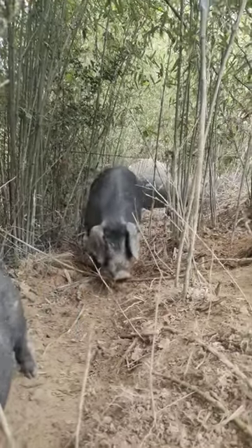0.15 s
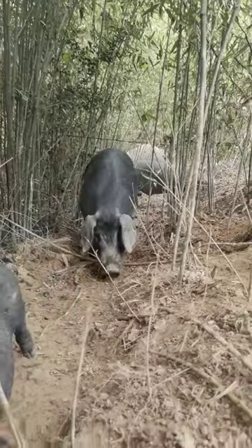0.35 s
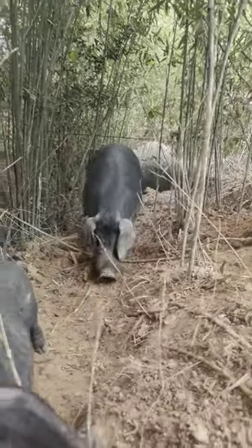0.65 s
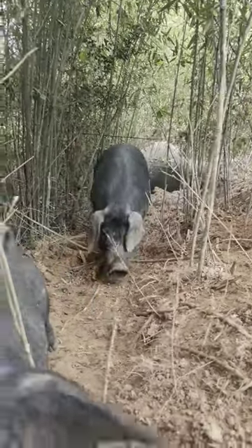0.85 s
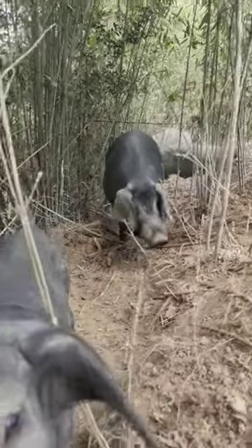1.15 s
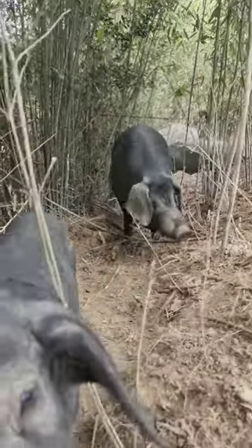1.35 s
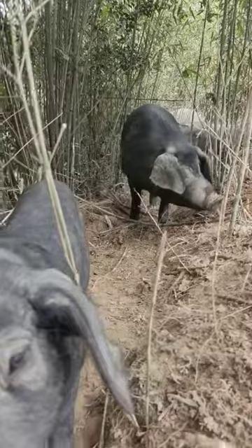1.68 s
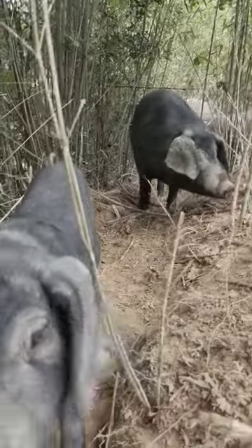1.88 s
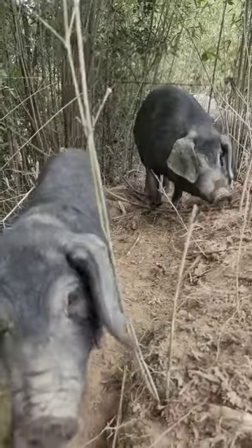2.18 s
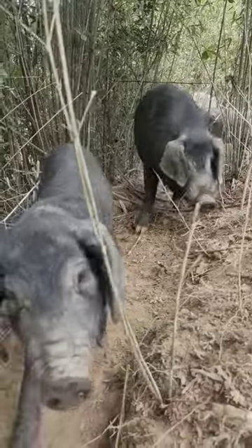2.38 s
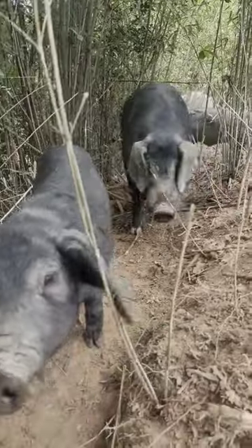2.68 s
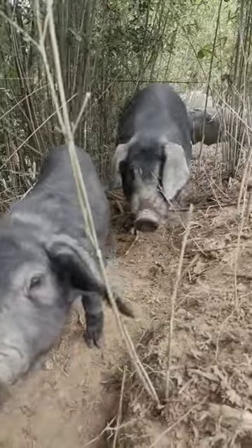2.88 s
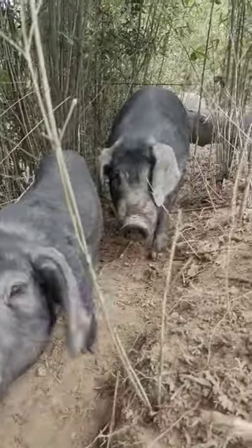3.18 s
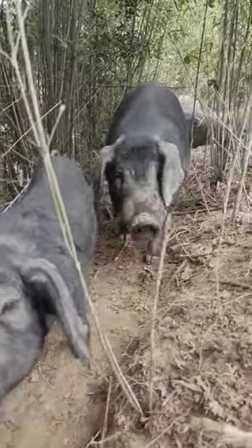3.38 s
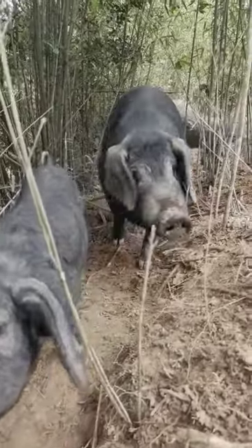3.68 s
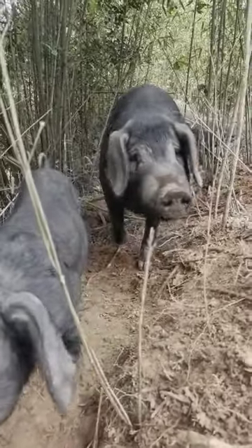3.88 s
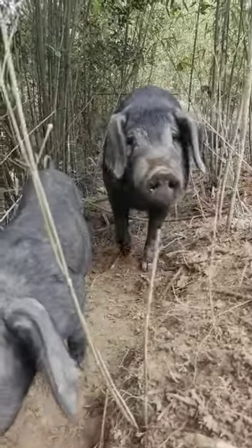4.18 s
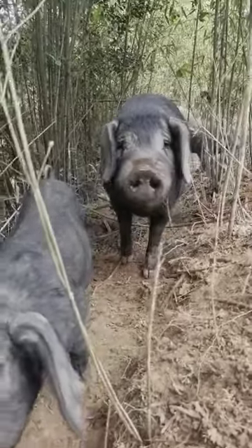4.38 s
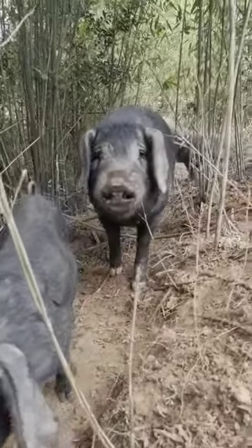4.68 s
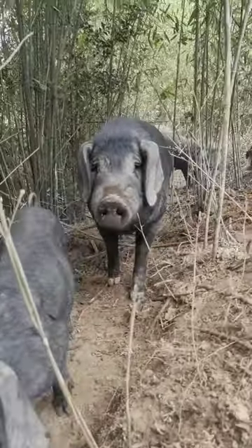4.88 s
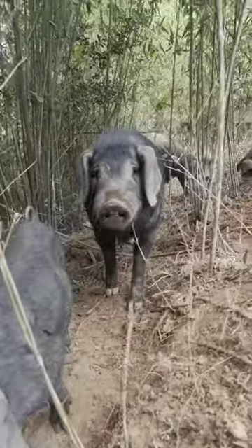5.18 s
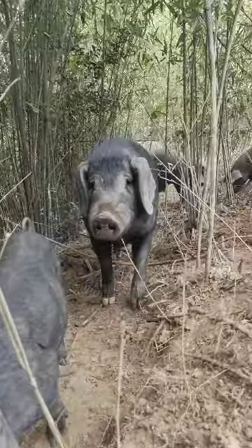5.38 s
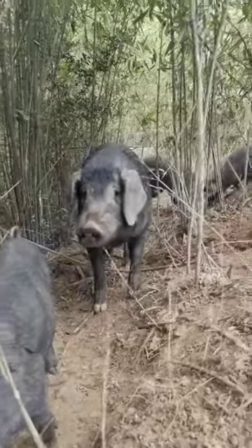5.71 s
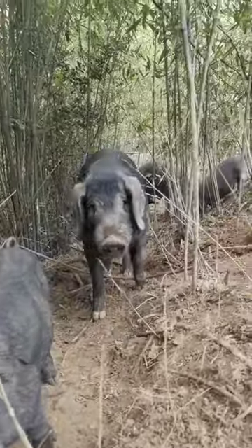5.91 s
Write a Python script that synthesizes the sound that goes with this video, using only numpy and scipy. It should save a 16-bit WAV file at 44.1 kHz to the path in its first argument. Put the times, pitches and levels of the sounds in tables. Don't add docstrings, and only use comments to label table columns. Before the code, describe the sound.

Pigs forage in a bamboo grove. Twigs snap at the start, then soft, closed-mouth grunts come from a little further off among lip smacks and rustling leaves. A short pulsing growl comes before two seconds, and midway one close, wet snort flutters loudest of all. A cicada on the right keeps sweeping upward over a faint distant chorus and airy hiss. Wide outdoor stereo, microphone near the animals.

```python
import sys
import numpy as np
from scipy import signal
from scipy.io import wavfile

SR = 44100
rng = np.random.default_rng(int(sys.argv[2]) if len(sys.argv) > 2 else 0)


def to_wav(sig):
    pcm = np.clip(np.atleast_2d(sig), -1, 1) * 32767
    pcm = np.round(pcm).astype(np.int16)
    wavfile.write(sys.argv[1], SR, pcm.T)


def to_linear_factor(level_db):
    exponent = np.asarray(level_db, float) / 20
    return 10 ** exponent


N = 266805


def growl():
    # resonance in Hz, width in Hz, level in dB, slide in Hz per s
    throat_modes = [(78.4, 34, -1.5, 0), (234, 20.6, 3, -3), (489, 57, 6.5, 2), (600, 33, -4, 200),
                    (840, 96, -13, 0), (1100, 46, -4.5, 0), (2500, 81, 1.5, 0), (2930, 72, 3, 0),
                    (3100, 100, -14, 0)]
    start_s, gap_s, slowing_s = 1.6806, 0.0290, 0.0007
    top_db, crest_slap, edge_db = -24, 2.62, 0.55
    open_db, closed_db = -2, -20
    count = 6
    slaps = []
    for k in range(count):
        s = start_s + gap_s * k + slowing_s * k * k
        db = top_db - edge_db * (k - crest_slap) ** 4
        slaps.append((s, db, open_db if k < count - 2 else closed_db))
    voice = throat(slaps, throat_modes, breath=0.06, puff_s=0.0015, left_db=-5, sharp_hz=4000)
    return nose(voice, 1600, 820)


def snort():
    # start in seconds, level in dB, brightness in dB, whistle in dB
    flutter = [(3.473, -15, -4, 4), (3.4792, -16, -7.5, 16), (3.4854, -34, 2, 4), (3.492, -18.5, 12.5, -22),
               (3.4982, -13.5, -1.5, -5), (3.5038, -14.5, 8, 3.5), (3.5066, -19.5, -25, -2),
               (3.527, -22.5, -23, -2), (3.5315, -16.5, -3, 7), (3.538, -31, 10, -13), (3.546, -33, -24, 5),
               (3.553, -40, 2, 0), (3.568, -52, 0, -2), (3.581, -36, -16, -2), (3.591, -31.5, -10, -2),
               (3.612, -54, -17, -2)]
    # resonance in Hz, width in Hz, level in dB, slide in Hz per s
    throat_modes = [(170, 250, 7, 0), (270, 92, -12, 0), (442, 83, -2.5, 0), (549, 90, 0.5, -300),
                    (970, 70, -23, 300), (1220, 83, -19, 500), (1370, 83, -14.5, 0), (1810, 200, -14, 0),
                    (2060, 136, 0.5, -2800), (2625, 92, -8, -900), (2900, 160, -10, 0), (3280, 220, -11, 0),
                    (3800, 170, -34, 0)]
    voice = throat(flutter, throat_modes, breath=0.15, puff_s=0.0015, left_db=-4.5, sharp_hz=0)
    return nose(nose(voice, 734, 300), 2380, 200)


def throat(slaps, modes, breath, puff_s, left_db, sharp_hz):
    out, t = np.zeros((2, N)), np.arange(4000) / SR
    first_s = slaps[0][0]
    for s, db, *lift_db in slaps:
        puff = rng.standard_normal(4000) * breath * np.exp(-t / puff_s)
        i = round(s * SR)
        for hz, wide, mode_db, slide in modes:
            gain_db = db + mode_db - 11.5 + lift_db[0] * (hz > 900) + sum(lift_db[1:]) * (hz > 3000)
            push = puff * min(hz / 1000, 1) - (t == 0)
            side_db = left_db * min(hz / 600, 1)
            slid_hz = (hz + slide * (s - first_s)) * (1 + 0.006 * rng.standard_normal())
            resonance = sharp if hz < sharp_hz else steep
            out[:, i:i + 4000] += pan(to_linear_factor(gain_db) * resonance(push, slid_hz, wide), side_db)
    return out


def nose(x, trap_hz, width_hz):
    x = signal.lfilter(*signal.iirnotch(trap_hz, trap_hz / width_hz, fs=SR), x)
    return signal.sosfilt(signal.butter(6, 52, "high", fs=SR, output="sos"), x)


def mutter():
    # start in seconds, number of pulses, gap in
    # seconds, peak in dB, throat pitch in Hz
    grunts = [(0.386, 4, 0.029, -40, 170), (1.156, 2, 0.017, -42.5, 270), (1.475, 1, .02, -46, 284),
              (1.51, 3, .0225, -36, 228), (2.442, 1, .02, -40, 198), (2.675, 1, .02, -39.5, 226),
              (2.906, 2, .028, -46, 188), (3.534, 2, 0.012, -37, 67.4), (4.065, 2, 0.024, -43.5, 224),
              (4.224, 1, .02, -36, 200), (5.858, 2, 0.026, -38, 239), (5.937, 3, 0.031, -41.5, 242)]
    swell_s, pulse_loss_db = 0.0071, 6
    t, out = np.arange(N) / SR, np.zeros(N)
    for start, pulses, gap, peak_db, hz in grunts:
        for k in range(round(pulses)):
            s = start + gap * k
            db = peak_db - pulse_loss_db * abs(k - 1)
            span = slice(round((s - 0.01) * SR), round((s + 0.12) * SR))
            since = t[span] - s
            u = np.maximum(since + swell_s, 0) / swell_s
            tone = np.sin(2 * np.pi * hz * since)
            chest = 0.38 * np.sin(2 * np.pi * 0.48 * hz * since)
            out[span] += to_linear_factor(db) * u * np.exp(1 - u) * (tone + chest)
    return pan(out, -0.33)


def snaps():
    # start in seconds, peak in dB, ring in Hz, neighbour modes in dB
    smacks = [(.112, -54.5, 935, -14), (.389, -36, 736, -25), (.884, -47.5, 660, 4.5),
              (.905, -45.5, 880, -1), (1.283, -44.5, 500, -13), (1.3, -49, 613, -3),
              (1.459, -47.5, 720, -18), (1.843, -41.5, 600, -8), (1.871, -41, 580, 1),
              (2.323, -44, 734, -3.5), (3.531, -30.5, 1224, -16.5), (2.713, -46.5, 1080, -12),
              (2.807, -42.5, 973, -16), (3.16, -52.5, 900, -2.5), (3.305, -56, 870, 0),
              (3.957, -53, 1050, -8), (3.998, -52, 980, -20), (4.297, -47, 640, -26),
              (4.489, -47.5, 1150, -10), (4.595, -50, 840, -23), (4.609, -46.5, 620, -19),
              (4.935, -55.5, 1090, 1), (5.098, -50, 650, 2), (5.108, -54, 1150, -2), (5.735, -50, 780, -15)]
    # start in seconds,
    # peak in dB, ring in Hz, left against right in dB
    twigs = [(0.033, -53, 1560, -18), (.074, -30.5, 2460, -9.5), (0.075, -47.5, 1600, -26),
             (0.082, -35, 2090, 4), (0.1, -46, 2250, -6), (0.121, -48.5, 2300, -5),
             (0.121, -44.5, 3200, -16), (0.355, -36, 2570, -9), (0.784, -44, 2230, -19),
             (1.008, -42, 2820, -5), (1.842, -44, 3000, -10), (1.868, -36, 2870, -1),
             (1.878, -37, 1950, -3), (1.874, -36, 3260, -3), (1.878, -36, 3180, -3),
             (1.878, -35.5, 2295, 7), (1.885, -32, 2870, -1.5), (1.893, -45, 2930, -3),
             (1.9, -43, 3100, -3), (2.986, -40.5, 2520, 11), (2.988, -46, 1770, -12),
             (3.959, -52, 2900, 10), (4.356, -54, 2220, -4), (4.488, -39, 1825, 7),
             (4.492, -40.5, 3160, -5), (5.107, -45, 2920, -7), (5.932, -50, 1810, -17)]
    # start in
    # seconds, peak in dB, ring in Hz
    ticks = [(0.0746, -42, 7000), (0.3596, -44, 5670), (3.333, -48, 5750), (3.4446, -49, 5460),
             (3.461, -47, 5200), (3.5894, -53, 5800), (5.336, -45, 8130), (5.8217, -46, 7830)]
    # (s, peak dB, ring Hz, 60 dB decay s, left-right dB, neighbours dB)
    cracks = [(s, db, hz, 0.035, -5, near_db) for s, db, hz, near_db in smacks]
    cracks += [(s, db, hz, 0.029, left_db, -12) for s, db, hz, left_db in twigs]
    cracks += [(s, db, hz, 0.005, -13.5, -9) for s, db, hz in ticks]
    out = np.zeros((2, N))
    for s, db, hz, t60, left_db, near_db in cracks:
        crack = np.exp(-np.arange(4000) / 12) * rng.standard_normal(4000)
        wide = np.log(1000) / np.pi / t60
        near = 0.44 * crack
        for ratio, widening in ((0.633, 1.1), (0.828, 1.06), (1.41, 2.0)):
            near = near + steep(crack, ratio * hz, wide * widening)
        onset = steep(crack, hz, wide * 3)
        ring_on = to_linear_factor(-5 * (hz > 1300)) * steep(crack, hz, wide)
        snap = to_linear_factor(db - 5.0) * (onset + ring_on + to_linear_factor(near_db) * near)
        i = round(s * SR)
        out[:, i:i + 4000] += pan(snap, left_db)[:, :N - i]
    return out


def echoes(x):
    # delay in seconds, level in dB
    returns = [(.011, -17.5), (.023, -24), (.041, -24), (.067, -55)]
    dull, out = signal.lfilter([0.3], [1, -0.7], x), np.zeros_like(x)
    for k, (s, db) in enumerate(returns):
        lag = round(s * SR)
        out[:, lag:] += to_linear_factor(db) * dull[::(-1) ** k, :-lag]
    return out


def litter():
    # start in seconds, hold in seconds, thud in dB, scuff against thud in dB
    rooting = [(0.345, 0.082, -50, -1.5), (.5, 0.025, -60, 5), (0.86, 0.041, -62.5, 12.5),
               (0.972, 0.074, -58.5, -32), (1.147, 0.075, -51.5, -5.5), (1.28, 0.1, -62.5, -1),
               (1.518, 0.0054, -45, -11), (1.693, 0.037, -54.5, -21), (1.88, 0.0088, -53, 4.5),
               (1.988, 0.073, -52, -1.5), (2.303, .01, -56.5, -2), (2.44, 0.012, -60.5, 3),
               (2.66, 0.1, -51, -11.5), (2.881, 0.032, -49.5, -10.5), (3.31, 0.035, -62.5, 2),
               (3.413, 0.01, -57, -29), (3.555, 0.1, -50.5, -5), (4.068, 0.0098, -48.5, -8.5),
               (4.235, 0.039, -49.5, -6), (4.37, 0.019, -58, -16), (4.462, 0.079, -73, 14),
               (4.762, 0.013, -57.5, -24), (4.896, 0.097, -51.5, -3.5), (5.1, 0.023, -74.5, 12.5),
               (5.46, 0.015, -51.5, -2), (5.555, 0.11, -56, -4.5), (5.717, 0.054, -54, -10.5),
               (5.939, 0.088, -48, -4)]
    # start in seconds, hold in seconds, hiss in dB, crunch against hiss in dB
    brushing = [(0.0, .005, -61, -1), (0.343, 0.059, -59, 5), (0.49, 0.015, -64.5, 11.5),
                (0.794, 0.014, -55.5, 5.5), (0.86, 0.014, -51.5, 2), (0.976, 0.014, -58.5, 0.5),
                (1.142, 0.051, -67.5, 5), (1.277, 0.36, -69.5, 3), (1.586, 0.012, -54.5, -6),
                (1.715, 0.06, -56.5, 3), (1.871, 0.011, -52.5, 3), (2.03, 0.25, -60.5, -1),
                (2.375, 0.23, -67.5, 4.5), (2.681, 0.093, -57, 2.5), (2.901, 0.098, -58, 1.5),
                (3.048, .005, -53, 2), (3.248, 0.048, -61, 1.5), (3.463, 0.11, -61.5, 8),
                (3.537, 0.028, -66, 10), (3.973, 0.0045, -70, 3), (4.24, 0.03, -63, 4.5),
                (4.523, .005, -69.5, 11.5), (4.6, .01, -65.5, 0), (4.765, .005, -63.5, 4),
                (4.888, 0.074, -59.5, 4), (5.027, .005, -51.5, -1.5), (5.097, 0.075, -61.5, 2),
                (5.31, 0.2, -61, -1), (5.578, 0.031, -59, -5), (5.727, 0.074, -56, -3),
                (5.942, 0.13, -57.5, 2)]
    # resonance in Hz, width in Hz, level in dB
    thud_modes = [(70, 54, -36), (125.6, 31, -15.5), (200, 65, -3), (304, 64, -4)]
    scuff_modes = [(415, 126, 1.5), (639, 173, 2.5), (908, 290, -2)]
    crunch_modes = [(1150, 530, -4.5), (2086, 436, -2.5), (2885, 760, 0), (3600, 680, -14)]
    # frequency in Hz, density in dB per Hz
    leaf_spectrum = [(2650, -30), (4500, 2.5), (6010, -5), (7750, -2.5), (9530, -10.5), (10700, -10),
                     (12300, 3), (15500, -3.5)]
    push, brush = (294, 204), (330, 157)
    thud = bursts([(s, hold, db) for s, hold, db, _ in rooting], *push, rest_db=-72)
    scuff = bursts([(s, hold, db + rel) for s, hold, db, rel in rooting], *push, rest_db=-69.5)
    hiss = bursts([(s, hold, db) for s, hold, db, _ in brushing], *brush, rest_db=-72)
    crunch = bursts([(s, hold, db + rel) for s, hold, db, rel in brushing], *brush, rest_db=-76)
    out = hiss * bands(grains(6200, 1.8, (2, 2, N)), leaf_spectrum, 4120, count=6, patchy_db=2.2)
    layers = ((thud_modes, thud, 120), (scuff_modes, scuff, 250), (crunch_modes, crunch, 700))
    for modes, gain, per_s in layers:
        body = 0
        for hz, wide, db in modes:
            struck = ring_twice(grains(per_s, 1.8, (2, N)), hz, wide * 1.45)
            body = body + to_linear_factor(db + 2.4 * drift(7)) * spread(*rms_one(struck), hz)
        out += gain * rms_one(body)
    return out


def grains(per_s, size_db, shape):
    sizes = to_linear_factor(size_db * np.minimum(rng.exponential(1, shape), 4)) * rng.choice([-1, 1], shape)
    return sizes * (rng.random(shape) < per_s / SR)


def crackles():
    # start in seconds, peak in dB
    cracks = [(0.6629, -68), (0.7183, -65), (0.7776, -44), (1.8687, -55), (2.7127, -44), (2.9487, -44),
              (3.0395, -48), (3.1567, -50), (3.5329, -57), (3.7993, -61), (4.0023, -56), (4.0208, -55),
              (4.4882, -54), (4.7187, -54), (5.0928, -49), (5.5613, -45.5), (5.9334, -51)]
    decay_s, trim_db, low_hz = 0.0097, -11, 4500
    gain, t = np.zeros(N + 4000), np.arange(4000) / SR
    for s, db in cracks:
        gain[round(s * SR):][:4000] += to_linear_factor(db + trim_db) * np.exp(-t / decay_s)
    high_pass = signal.butter(3, low_hz, "high", fs=SR, output="sos")
    bright = signal.sosfilt(high_pass, rng.standard_normal((2, N)))
    return pan(bright * gain[:N], -14.0)


def cicada(buckle_per_s=267, buzz=0.04):
    gate = 1 + buzz * np.cos(2 * np.pi * buckle_per_s * np.arange(N) / SR + 2.2 * drift(14.7))
    pitches = np.linspace(2700, 4850, 16)
    rib_width_hz = 90
    song = 0
    for gain, hz in zip(phrases(pitches), pitches):
        rib = rms_one(ring_twice(rng.standard_normal(N), hz, rib_width_hz))
        song = song + gain * to_linear_factor(1.4 * drift(17.0)) * rib
    song *= gate * to_linear_factor(1.1 * drift(12))
    late = np.roll(song, round(0.002497 * SR))
    return np.array([to_linear_factor(-9.0) * (0.57 * song + 1.05 * late), to_linear_factor(1.0) * song])


def phrases(pitches):
    # start in seconds, length in seconds, level in dB, first pitch in Hz, last pitch in Hz
    sweeps = [(0.185, 0.43, -48.5, 3090, 3600), (0.503, 0.23, -50.5, 4170, 4300),
              (0.69, 0.17, -49, 4220, 4200), (1.3, 0.14, -46, 3300, 3330), (1.4, 0.29, -45.5, 3280, 3680),
              (1.77, 0.26, -56, 3800, 3820), (2.328, 0.12, -49, 3100, 3260),
              (2.456, 0.53, -48.5, 3380, 3900), (3.254, 0.32, -52, 3250, 3820),
              (3.61, 0.15, -50, 3300, 3500), (3.733, 0.24, -52.5, 3670, 4000),
              (3.844, 0.39, -52.5, 3360, 3600), (4.327, 23, -57, 3660, 3600),
              (4.704, 0.43, -51.5, 3280, 3700), (5.146, 0.28, -51.5, 3800, 4200),
              (6.007, 0.45, -49.5, 3270, 3480)]
    spread_hz, spread_per_hz, narrow_hz = 140, 0.55, 3170
    climb_power, sag_db, rise_db_s, fall_db_s = 1.2, 5, 228, 95
    t, power = np.arange(0, N + 128, 128) / SR, 0
    for s, length, db, first_hz, last_hz in sweeps:
        done = np.clip((t - s) / length, 0, 1)
        centre = first_hz + (last_hz - first_hz) * done ** climb_power
        width = spread_hz + spread_per_hz * np.maximum(centre - narrow_hz, 0)
        share = np.exp(-((pitches[:, None] - centre) / width) ** 2)
        level_db = db - sag_db * done + shape_db(t, s, length, rise_db_s, fall_db_s)
        power = power + to_linear_factor(level_db) ** 2 * share / share.sum(axis=0)
    return [np.interp(np.arange(N) / SR, t, row) for row in np.sqrt(power)]


def drone():
    # start in seconds, hold in seconds, level in dB
    streaks = [
        (2.77, 0.089, -59),
        (4.3, 0.5, -68),
        (4.85, .45, -64.5),
        (5.42, 0.16, -61),
        (5.7, 0.22, -59.5),
    ]
    hz = 3870 - 30.07 * np.arange(N) / SR + 25 * drift(8.9)
    note = np.sin(2 * np.pi * np.cumsum(hz) / SR) * to_linear_factor(4 * drift(25))
    return pan(rms_one(note) * bursts(streaks, 100, 140, -110), 2.3)


def cricket():
    # start in seconds, hold in
    # seconds, level in dB
    chirps = [
        (1.61, 0.062, -66.5),
        (1.82, 0.03, -68),
        (1.98, 0.077, -61.5),
        (2.15, 0.73, -72),
        (3.1, 0.054, -64.5),
              (4.21, 0.11, -74),
        (4.998, 0.17, -67),
    ]
    whistle = rms_one(ring_twice(rng.standard_normal(N), 2375, 60)) * to_linear_factor(2.5 * drift(30))
    return pan(whistle * bursts(chirps, 300, 270, -110), 1.8)


def chorus():
    out = 0
    for hz in np.linspace(2691, 4772, 15):
        mid, side = ring_twice(rng.standard_normal((2, N)), hz, 65)
        out = out + to_linear_factor(3 * drift(6)) * np.array([rms_one(mid), rms_one(side)])
    return to_linear_factor(-64) * rms_one(spread(*out, 3560))


def grove():
    # frequency in Hz, density in dB per Hz
    air_spectrum = [(15, -38), (25, -3), (126, 4), (495, -20.5), (703, -29), (1340, -22.5), (3170, -12),
                    (3930, -10), (4750, -39), (5140, -31), (6210, -39.5), (8130, -26), (9050, -34),
                    (13500, -25.5), (15500, -40)]
    noise = rng.standard_normal((2, 2, N))
    return to_linear_factor(-57.0) * bands(noise, air_spectrum, 34.0, count=27, patchy_db=3.5)


def bands(source, spectrum, low_hz, count, patchy_db):
    out, edges = 0, np.minimum(low_hz * 2 ** (np.arange(count + 1) / 3), 17000)
    for k, (low, high) in enumerate(zip(edges, edges[1:])):
        band_pass = signal.butter(2, [low, high], "band", fs=SR, output="sos")
        mid, side = signal.sosfilt(band_pass, source[k % 2])
        hz = np.sqrt(low * high)
        out = out + to_linear_factor(at_hz(spectrum, hz) + patchy_db * drift(13.8)) * spread(mid, side, hz)
    return rms_one(out)


def spread(mid, side, hz):
    # frequency in Hz, likeness of left and right from -1 to 1
    likeness = [(60, 0.67), (240, 0.9), (500, 0.28), (1000, -0.38), (3800, 0.42), (7500, -0.83),
                (15000, -0.32)]
    # frequency in Hz, left against right in dB
    balance = [(60, -0.5), (240, 0.5), (500, -4), (1900, 1), (3800, -7.5), (7500, -8.5), (15000, -3.5)]
    alike = np.clip(at_hz(likeness, hz), -0.95, 0.95)
    both = np.sqrt(1 + alike) * mid + np.sqrt(1 - alike) * side * [[1], [-1]]
    return pan(1, at_hz(balance, hz)) * both


def pan(x, left_db):
    return x * to_linear_factor(np.array([[left_db / 2], [-left_db / 2]]))


def ring(x, hz, width_hz):
    r, w = np.exp(-np.pi * width_hz / SR), 2 * np.pi * hz / SR
    return signal.lfilter([0, np.sin(w)], [1, -2 * r * np.cos(w), r * r], x + 1e-18)


def ring_twice(x, hz, width_hz):
    return ring(ring(x, hz, width_hz), hz, width_hz)


def steep(x, hz, width_hz):
    y = ring_twice(x, hz, 1.55 * width_hz)
    return y / abs(y).max()


def sharp(x, hz, width_hz):
    y = ring(x, hz, width_hz)
    return y / abs(y).max()


def shape_db(t, s, hold, rise_db_s, fall_db_s):
    return -rise_db_s * np.maximum(s - t, 0) - fall_db_s * np.maximum(t - s - hold, 0)


def bursts(rows, rise_db_s, fall_db_s, rest_db):
    t = np.arange(0, N + 64, 64) / SR
    power = to_linear_factor(rest_db) ** 2
    for s, hold, db in rows:
        power = power + to_linear_factor(db + shape_db(t, s, hold, rise_db_s, fall_db_s)) ** 2
    return np.interp(np.arange(N) / SR, t, np.sqrt(power))


def drift(rate):
    r = np.exp(-80 * np.pi * rate / SR)
    slow = signal.lfilter([1], [1, -2 * r, r * r], rng.standard_normal(N // 40 + 2002))[2000:]
    return np.interp(np.arange(N) / 40, np.arange(len(slow)), rms_one(slow))


def at_hz(points, hz):
    point_hz, value = np.transpose(points)
    return np.interp(np.log(hz), np.log(point_hz), value)


def rms_one(x):
    return x / np.sqrt(np.mean(x ** 2) + 1e-20)


def scene():
    pigs = growl() + snort() + mutter() + snaps()
    ground = litter() + crackles()
    insects = cicada() + drone() + cricket() + chorus()
    return pigs + echoes(pigs) + ground + insects + grove()


def band_limit(x):
    return signal.sosfilt(signal.butter(12, 15400, fs=SR, output="sos"), x)


def record(dry):
    mix = np.array([np.roll(dry[0], 1), dry[1]])
    return band_limit(mix)


dry = scene()
out = record(dry)
to_wav(out)
```